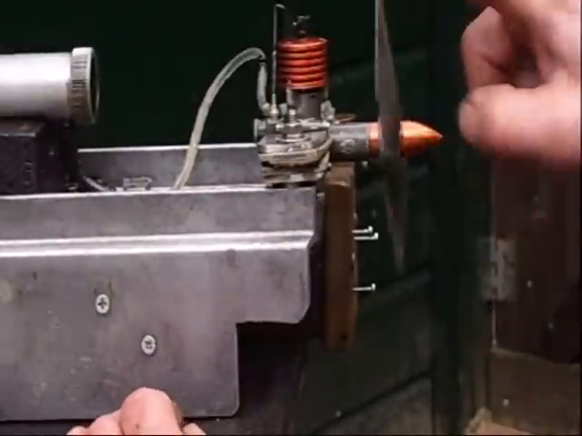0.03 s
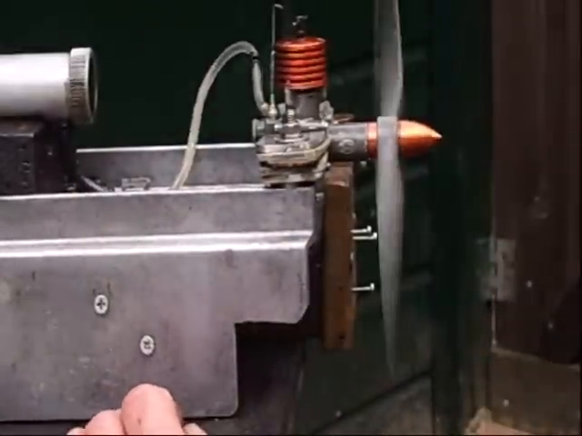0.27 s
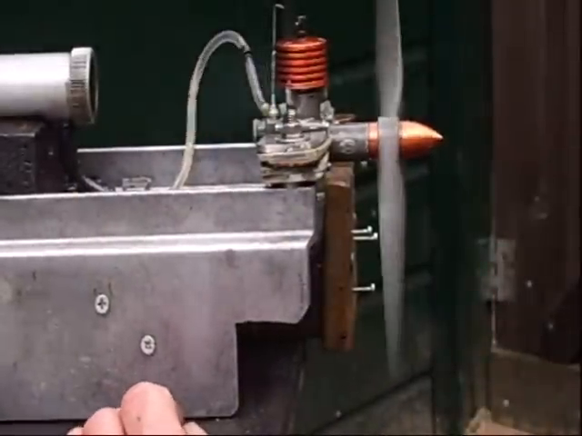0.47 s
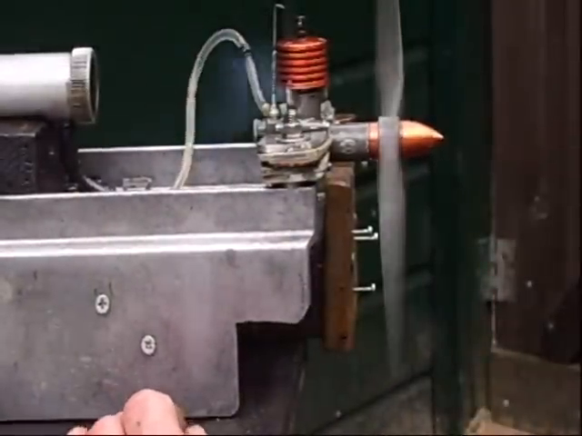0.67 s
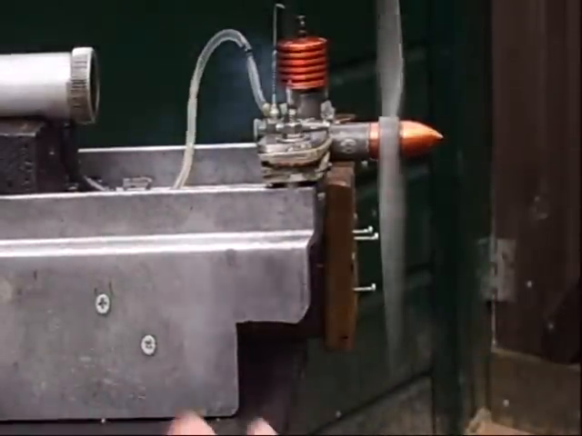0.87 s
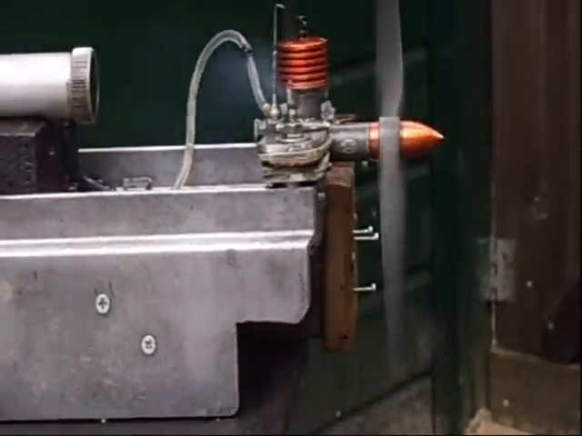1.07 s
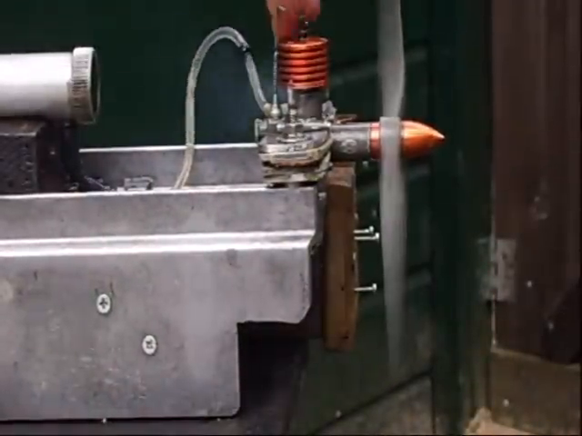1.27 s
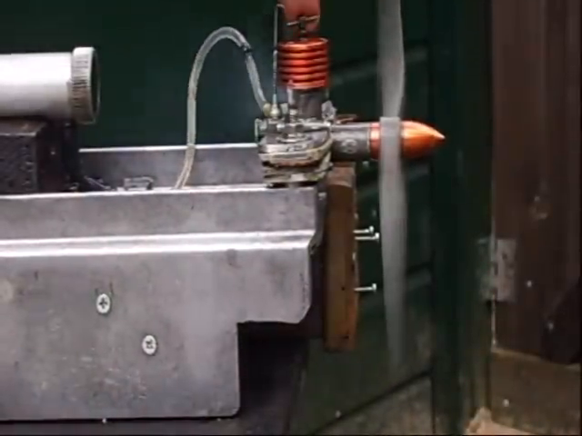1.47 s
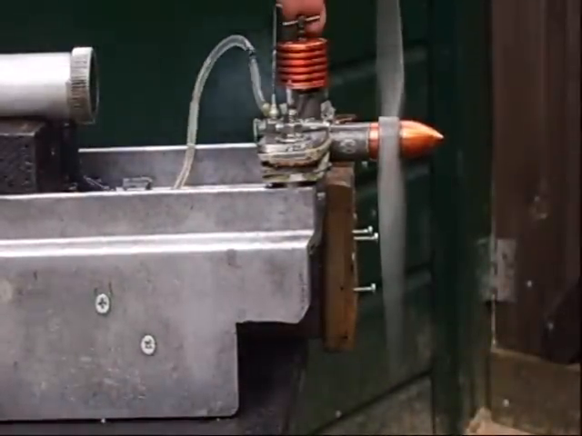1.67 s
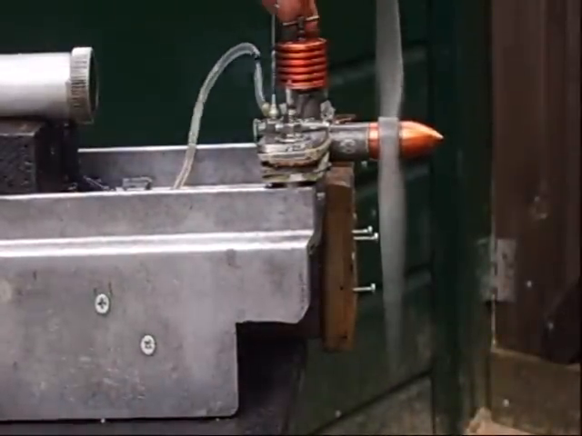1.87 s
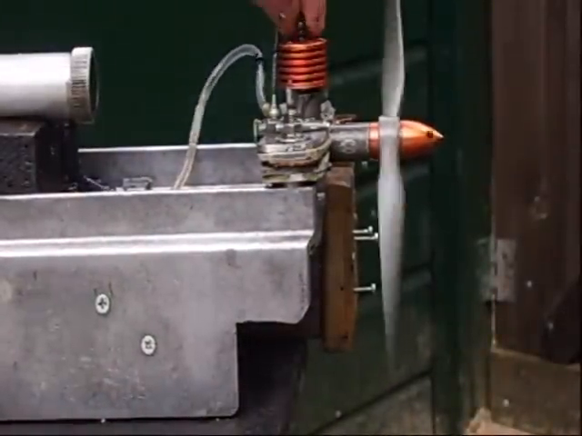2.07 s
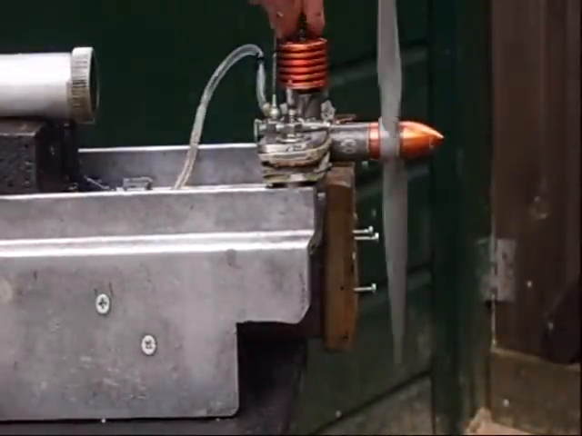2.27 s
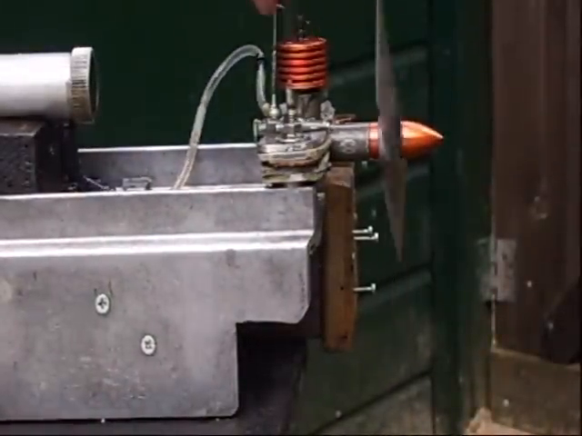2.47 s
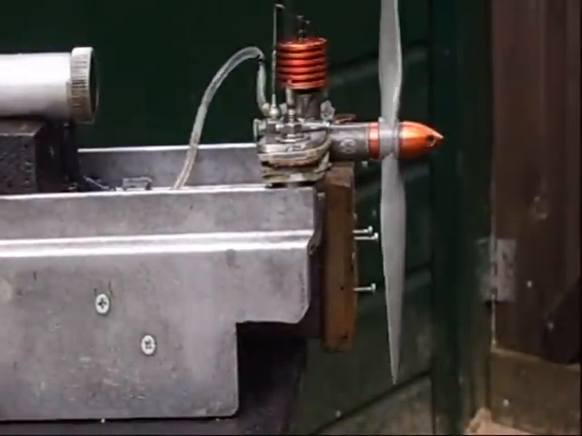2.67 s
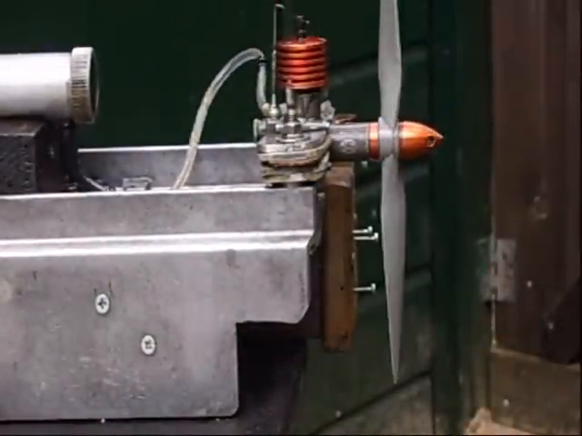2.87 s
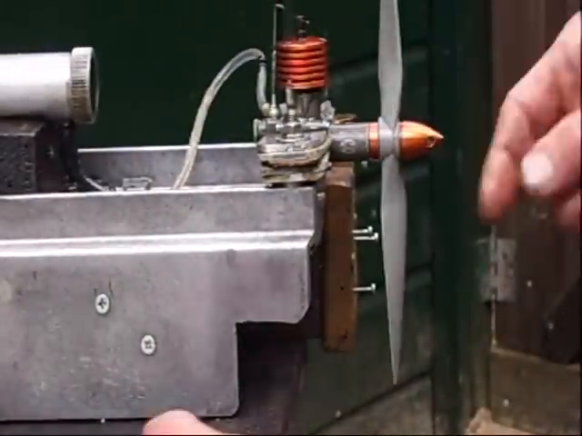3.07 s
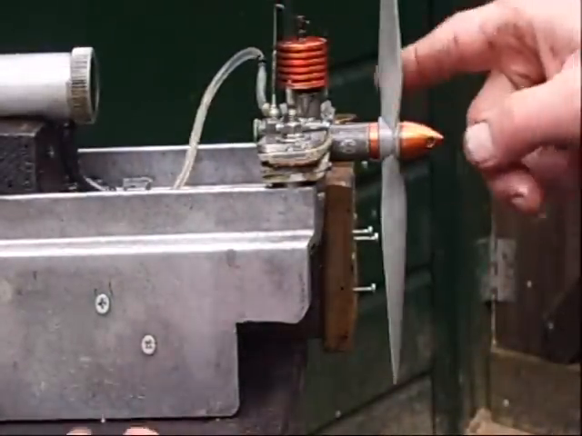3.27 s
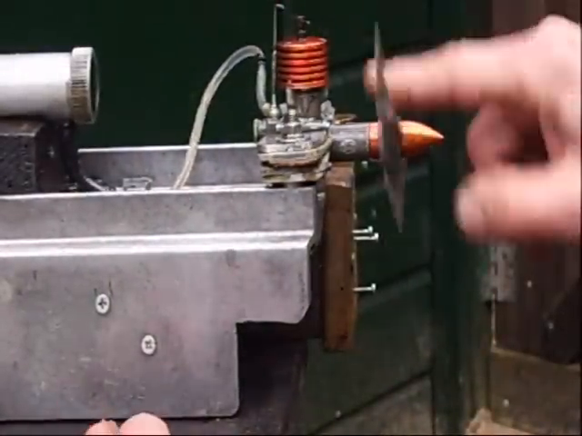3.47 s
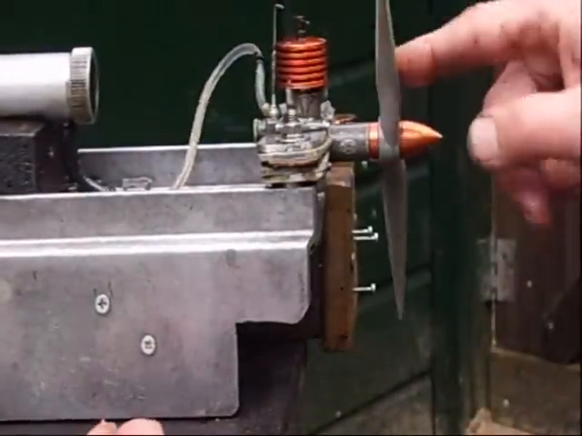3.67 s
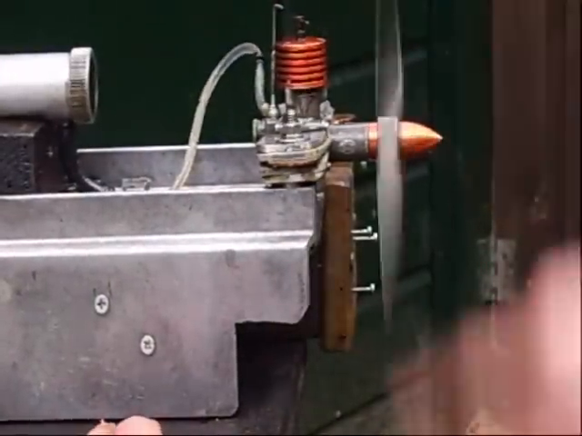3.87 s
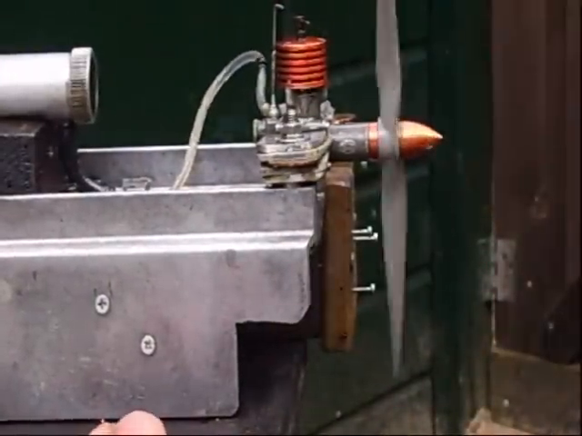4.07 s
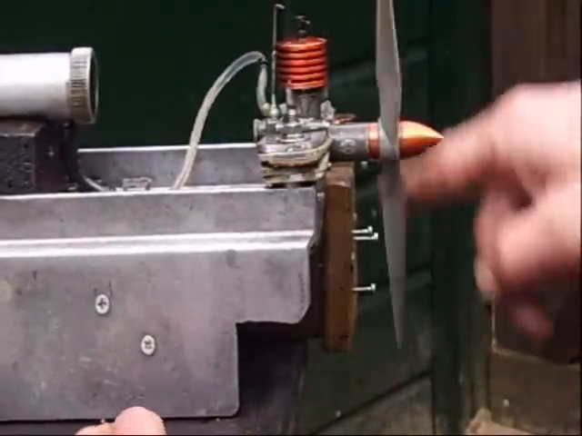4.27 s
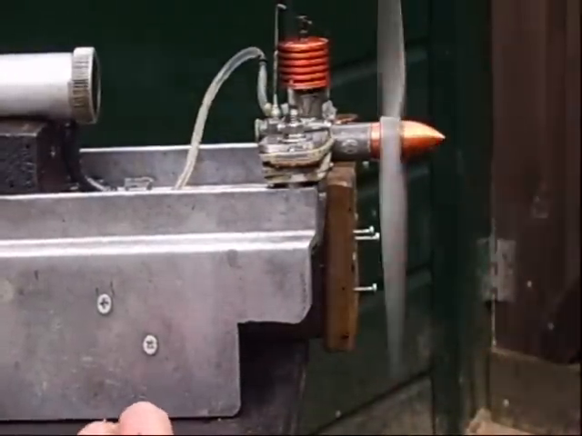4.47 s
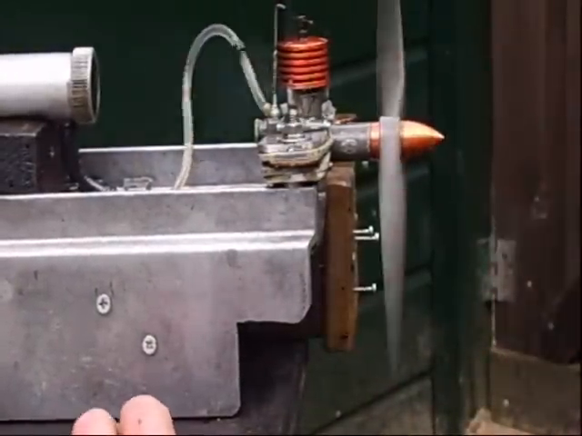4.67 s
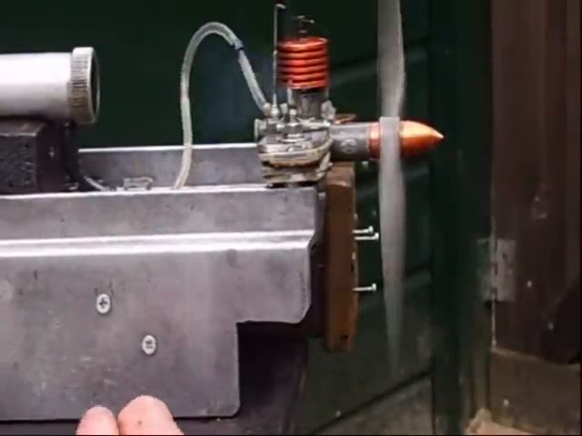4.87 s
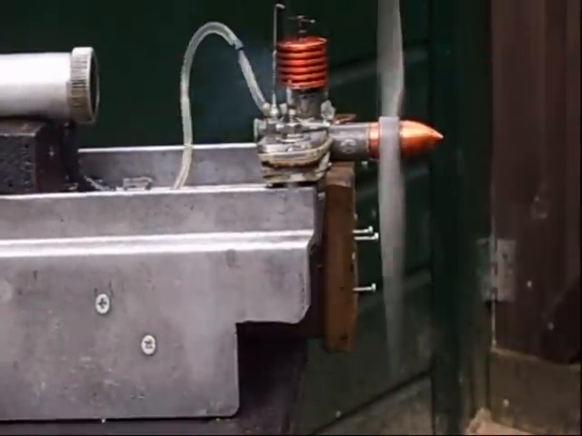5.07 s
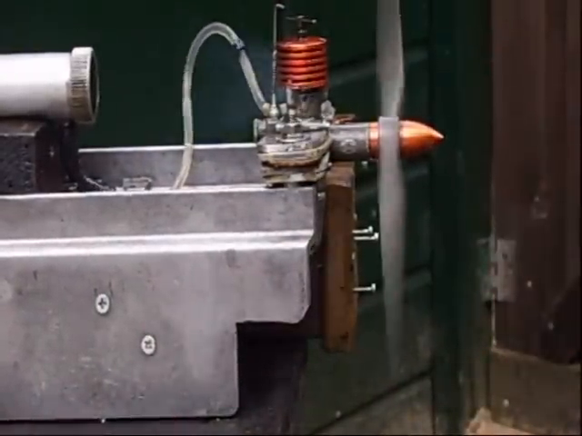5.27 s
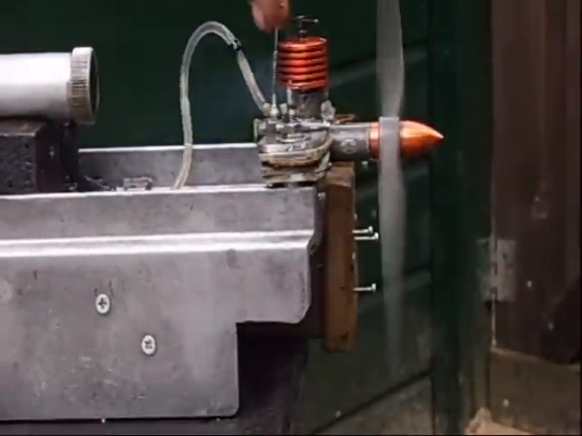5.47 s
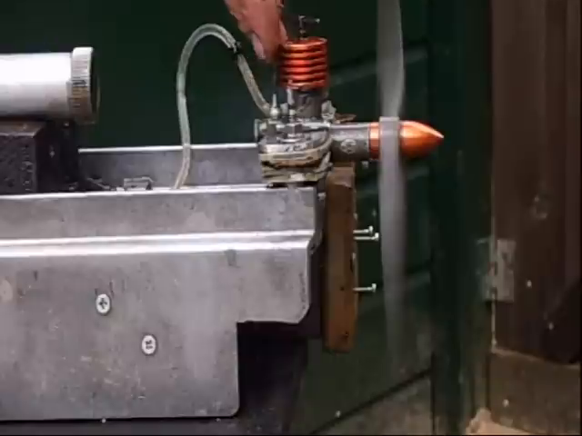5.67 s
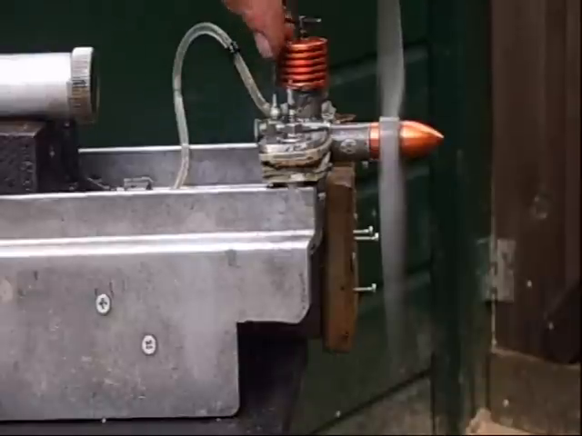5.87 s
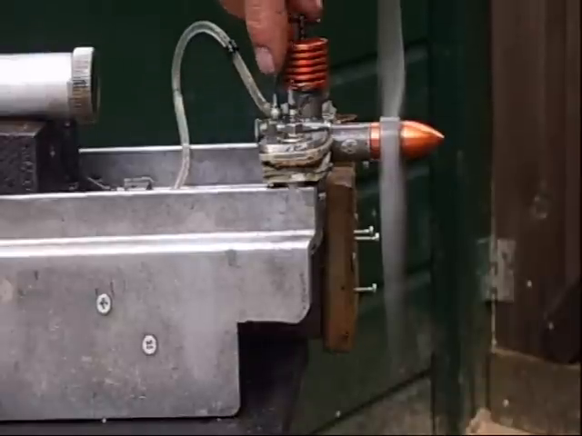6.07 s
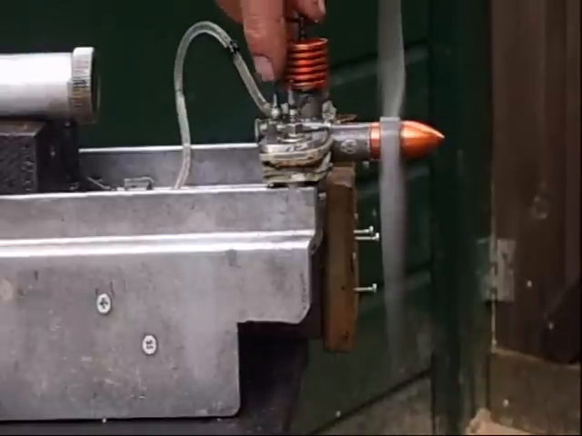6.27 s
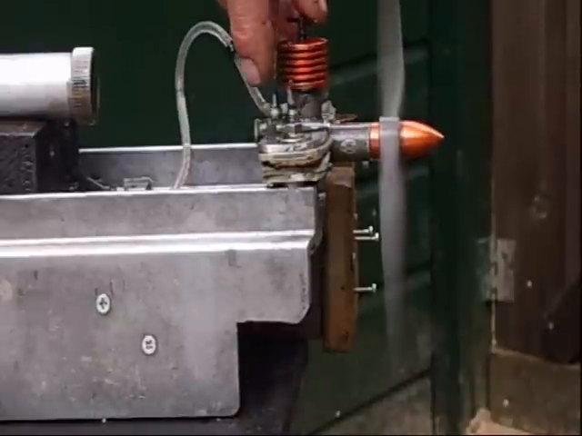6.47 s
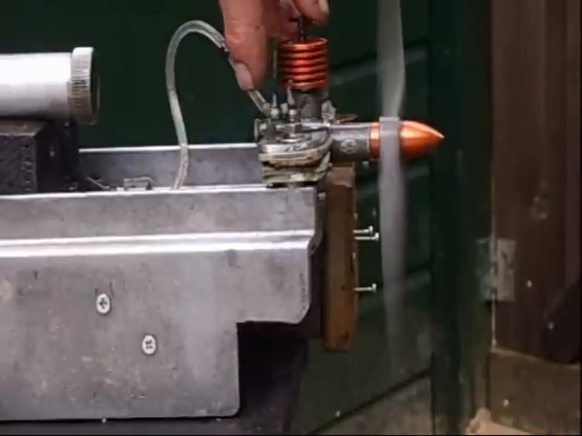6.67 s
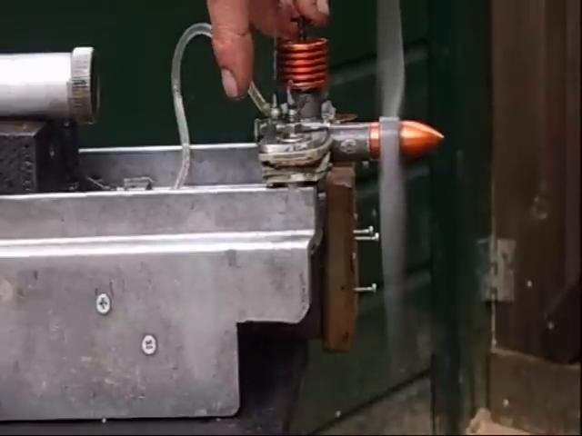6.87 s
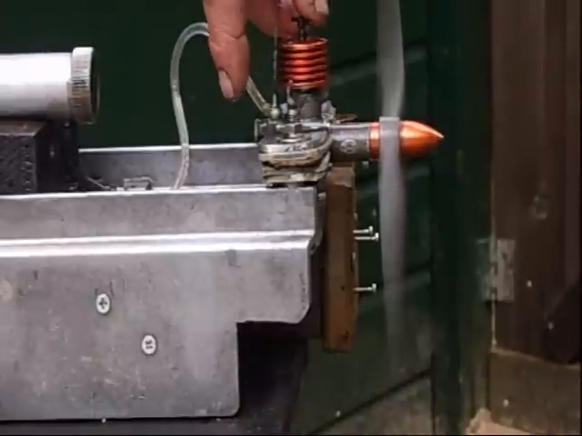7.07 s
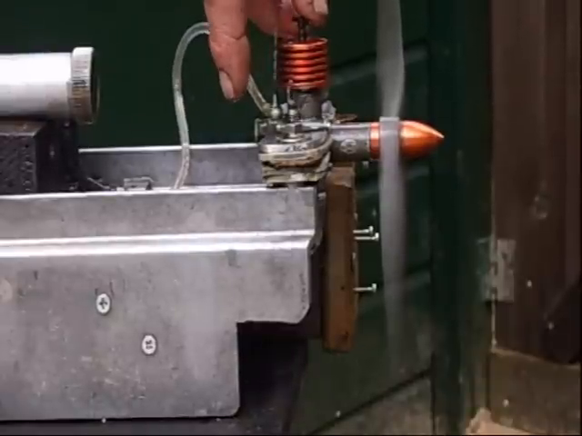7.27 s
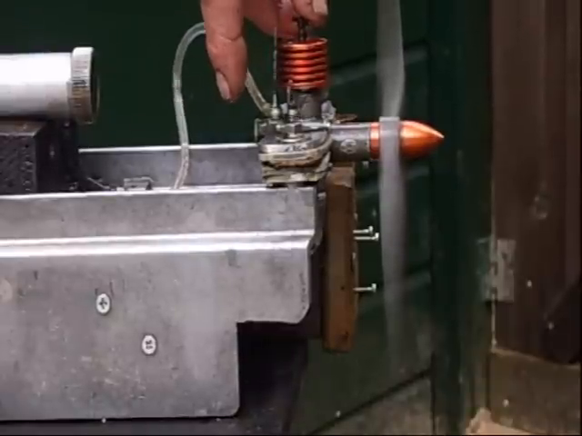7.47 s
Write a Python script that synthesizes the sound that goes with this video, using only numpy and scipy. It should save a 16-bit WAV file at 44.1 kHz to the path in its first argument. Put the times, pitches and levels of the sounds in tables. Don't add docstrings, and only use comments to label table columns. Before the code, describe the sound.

A tiny model engine is flicked into a harsh rattling buzz, sputters out, clicks under finger flicks, then restarts into a loud, rising, steady scream.

```python
import sys
import numpy as np
from scipy import signal
from scipy.fft import rfft, irfft
from scipy.io import wavfile
from scipy.ndimage import uniform_filter1d

SR = 44100
rng = np.random.default_rng(int(sys.argv[2]) if len(sys.argv) > 2 else 0)


def undo_db(level):
    steps = np.asarray(level, float) / 20
    return 10 ** steps


def to_wav(s):
    ch = np.atleast_2d(s).T
    pcm = np.round(np.clip(ch, -1, 1) * 32767)
    wavfile.write(sys.argv[1], SR, pcm.astype(np.int16))


N = 332073

# (frequency [Hz], width [Hz], level [dB])
CASE = [(1425, 173, 0), (1743, 163, 0.5), (2012, 91, 3), (2315, 270, 0), (2701, 106, 5), (3058, 72, 5),
        (3286, 105, 0.5), (3618, 450, -0.5), (3500, 170, -36), (4350, 510, -21.5)]
# (frequency [Hz], width [Hz], level [dB])
BENCH = [(310, 45, -6.5), (480, 80, -11.5), (629, 152, 2), (758, 74, 6.5), (918, 264, 8.5), (980.5, 104, 9),
         (1138, 44, 6)]


def in_time(rows, t):
    s, *columns = np.transpose(rows)
    return [np.interp(t, s, column) for column in columns]


def swells(rows, t):
    rows = np.array(rows)
    centre_s, half_width_s = rows[:, :1], rows[:, 1:2]
    return rows[:, 2:].T @ np.exp(-((t - centre_s) / half_width_s) ** 2)


def coloured(spectrum):
    hz, db = np.transpose(spectrum)
    bins_hz = np.arange(1, N // 2 + 2) * SR / N
    gain = undo_db(np.interp(np.log(bins_hz), np.log(hz), db))
    noise = irfft(rfft(rng.standard_normal(N)) * gain, N)
    return noise / noise.std()


def resonate(x, modes):
    out = 0
    for hz, width_hz, db in modes:
        r = np.exp(-np.pi * width_hz / SR)
        b = (1 - r * r) / 2 * np.array([1, 0, -1])
        a = [1, -2 * r * np.cos(2 * np.pi * hz / SR), r * r]
        out = out + undo_db(db) * signal.lfilter(b, a, x + 1e-18)
    return out


def high_pass(x, cut_hz):
    return signal.sosfilt(signal.butter(3, cut_hz, "high", fs=SR, output="sos"), x)


def lay(at_s, gain, shape):
    samples = np.ceil(at_s * SR).astype(int)[:, None] + np.arange(512)
    rows = gain[:, None] * shape(samples / SR - at_s[:, None])
    return np.bincount(samples.ravel(), rows.ravel(), N + 1024)[:N]


def hand_level(rows, lift_db, fade):
    t = np.arange(N) / SR
    moving = (t > rows[0][0]) & (t < rows[-1][0])
    return uniform_filter1d(moving * 1., size=fade) * undo_db(in_time(rows, t)[0] + lift_db)


def shed_air():
    # (frequency [Hz], level [dB per Hz])
    air = [(15, -9), (45, 5.5), (85, -2), (478, 3), (1000, -3), (1720, -13.5), (5000, -26), (15500, -31)]
    return undo_db(-51) * coloured(air)


def whine():
    # (frequency [Hz], rms level [dB])
    tones = [
        (4683, -72),
        (9324, -77),
    ]
    t = np.arange(N) / SR
    return sum(undo_db(db) * np.sqrt(2) * np.sin(2 * np.pi * hz * t) for hz, db in tones)


def sleeve():
    # (time [s], level [dB])
    rustle = [
        (2.99, -57),
        (3.078, -49.5),
        (3.086, -37.5),
        (3.1, -53),
        (3.104, -46),
        (3.17, -52),
        (3.26, -70),
    ]
    # (frequency [Hz], level [dB per Hz])
    cloth = [(35, -34), (60, -2), (300, -7), (780, -4.5), (1490, -19), (4510, -18), (7000, -30),
             (15000, -27)]
    return hand_level(rustle, 6.5, 1500) * coloured(cloth)


def scuff():
    # (time [s], level [dB])
    rub = [
        (2.88, -80),
        (2.892, -69),
        (2.92, -61),
        (3.022, -59),
        (3.028, -70),
        (3.05, -50),
    ]
    # (frequency [Hz], width [Hz], level [dB])
    metal = [(980, 270, 8), (2700, 300, 2.5), (3260, 270, -13), (11000, 1200, -11)]
    return hand_level(rub, 16.5, 900) * resonate(rng.standard_normal(N), metal)


def squeaks():
    # (time [s], half width [s], gain)
    rubs = [
        (2.535, 0.014, 0.95),
        (3.94, .015, 1),
        (4.23, .015, .6),
        (4.355, .012, .9),
    ]
    # (frequency [Hz], width [Hz], level [dB])
    blade = [(2600, 300, 3), (3100, 300, -6)]
    return undo_db(-48) * swells(rubs, np.arange(N) / SR)[0] * resonate(rng.standard_normal(N), blade)


def port_opens(at_s, push_db, crack_db, jet_db, gap_s, rough, stub_hz, stub_db, leak_db, cut_hz):
    # (frequency [Hz], width [Hz], level [dB])
    port = [(8320, 620, -2), (9500, 940, -6), (10100, 250, -2), (10900, 590, -4), (12800, 320, -33),
            (15500, 700, -41)]
    # (frequency [Hz], width [Hz], level [dB])
    fins = [(5470, 200, -30), (7780, 1500, -23.5), (10180, 430, -15.5), (10870, 560, -1.5),
            (12440, 1750, -5), (13250, 310, -6), (15900, 680, 2.5)]
    # (frequency [Hz], width [Hz], level [dB])
    blowby = [(4600, 690, 0)]
    vary = rng.standard_normal((len(at_s), 4))
    gap = (gap_s * (1 + .01 * vary[:, 3]))[:, None]
    gas = rng.standard_normal((2, len(at_s), 512))

    def bump(t, width_s):
        return np.exp(-((t - .0004) / width_s) ** 2)

    push = lay(at_s - .0003, undo_db(push_db + 0.67 * vary[:, 0]),
               lambda t: bump(t, 0.000097) + 0.82 * bump(t - gap, 0.28 * gap))
    crack = lay(at_s - .00035, undo_db(crack_db + .5 * vary[:, 1]),
                lambda t: bump(t, .00005) + rough * gas[0] * np.exp(-t / 0.0029))
    jet = lay(at_s - .0004, undo_db(jet_db + 0.12 * vary[:, 2]),
              lambda t: 9 * bump(t, .000025) + 0.15 * gas[1] * np.exp(-t / .0007))
    stub = lay(at_s, undo_db(jet_db + stub_db + 0.97 * vary[:, 2]),
               lambda t: np.cos(2 * np.pi * stub_hz[:, None] * t) * np.exp(-t / 0.00036))
    hiss = lay(at_s - .0004, undo_db(jet_db - 3.5), lambda t: gas[0] * np.exp(-t / 0.013))
    leak = lay(at_s - .0004, undo_db(jet_db + leak_db), lambda t: gas[1] * np.exp(-t / 0.0033))
    bang = undo_db(-7) * push + resonate(push, BENCH) + resonate(crack, CASE)
    bang = bang + undo_db(3.5) * resonate(jet, port) + resonate(hiss, fins) + stub + resonate(leak, blowby)
    return high_pass(bang, cut_hz)


def flicks():
    # (time [s], peak level [dB], sharpness [dB], push repeat [Hz])
    puffs = [(.157, -28, -11, 550), (0.173, -16.5, -3, 716), (2.161, -23, -0.5, 910), (2.229, -41, 5, 557),
             (2.249, -29.5, -9, 716), (2.303, -44, 2, 711), (2.321, -30.5, -13, 695), (2.33, -28, -13, 493),
             (2.922, -28.5, -20, 544), (3.083, -40, 7, 915), (3.105, -34, 2, 770), (3.129, -29, -3, 740),
             (3.156, -40, 6, 498), (3.326, -43.5, 5, 452), (3.974, -37.5, 14.5, 1170),
             (3.975, -12, -20, 590), (3.998, -24, 2, 953), (4.01, -15, 0, 840), (4.052, -22.5, -6, 930),
             (4.104, -30, -14, 710), (4.11, -22, -9.5, 587), (4.174, -35.5, -8, 645), (4.264, -39, -8, 886),
             (4.28, -32.5, -12, 506), (4.349, -35.5, -13, 1030), (4.443, -37, -16, 708),
             (4.465, -19, 2, 750)]
    s, db, sharp_db, repeat_hz = np.transpose(puffs)
    crack_db = db + sharp_db + 5.0
    jet_db = db + sharp_db - 11
    return port_opens(s + .0007, db - 3.0, crack_db, jet_db, 1 / repeat_hz, rough=0.49,
                      stub_hz=4170 + 0 * s, stub_db=10, leak_db=-2, cut_hz=180)


def propeller_hum(turns, rate):
    # (multiple of the turn, level above push [dB], power of speed)
    hum = [
        (2, -18, 4.6),
        (3, -16.5, 2.3),
        (4, -25.5, 1.5),
    ]
    return sum(undo_db(db) * (rate / 100) ** power * np.sin(2 * np.pi * round(k) * turns)
               for k, db, power in hum)


def propeller_wash(push_level):
    # (frequency [Hz], level [dB per Hz])
    wash = [(25, -1), (60, 3), (120, 2), (300, 5.5), (600, 9.5), (1200, -14)]
    return undo_db(-21) * push_level * coloured(wash)


def cylinder_swing(fire_s, db, speed):
    hz = (8.93 * speed)[:, None]

    def swing(t):
        rise = 1 - np.exp(-(t / 0.00039) ** 2)
        return np.cos(2 * np.pi * hz * (t - .00105)) * rise * np.exp(-(hz * t / 1.85) ** 0.31)

    return lay(fire_s - .0009, undo_db(db + 8) * (speed / 100) ** 3.8, swing)


def ignition_knock(knock_s, knock_db, rate):
    def rap(t):
        grit = .06 * rng.standard_normal(t.shape) * np.exp(-t / .0006)
        return np.exp(-((t - .0001) / .00003) ** 2) + grit

    tick = lay(knock_s, undo_db(knock_db + rng.normal(0, 1.2, len(knock_s))), rap)
    heavy = tick * np.minimum(rate / 65, 1) ** 2.5
    body = undo_db(-4) * resonate(heavy, BENCH) + undo_db(10) * resonate(heavy, CASE)
    return body + undo_db(5.5) * high_pass(tick, 4300)


def engine():
    # (time [s], speed [turns per s])
    speed_1 = [
        (.17, 27.39),
        (.25, 44.34),
        (.84, 69.37),
        (1.044, 67.21),
        (1.313, 75.32),
        (1.428, 75.95),
        (1.925, 45.49),
        (2.099, 33.22),
        (2.21, 6.46),
    ]
    speed_2 = [
        (4.46, 33.6),
        (4.747, 83.8),
        (5.015, 78.56),
        (5.403, 85.23),
        (5.585, 93.8),
        (6.068, 101.72),
        (6.244, 102.88),
        (6.781, 110.9),
        (7.53, 113.37),
    ]
    first_firing_s = (.1835, 4.4755)
    # (time [s], charge [dB], knock above push [dB], push gap trim [ratio])
    run_1 = [
        (.17, -5, -26, 1),
        (.22, -0.5, -28, 0.87),
        (.4, -0.5, -29, 0.93),
        (.55, -0.5, 4, .87),
        (.75, -2, -28, 0.91),
        (1.3, -1, -13, .91),
        (1.75, -1, 7, 0.9),
        (2.12, -2, 3, 0.99),
        (2.2, -11.5, 0, 0.58),
    ]
    run_2 = [
        (4.47, -1, -9, 0.94),
        (4.7, 0, 5.5, 0.83),
        (5.0, -1.5, -30, 0.9),
        (5.35, -1, -5, 0.84),
        (5.72, -2, 12.5, 0.87),
        (6.0, -1, -17, 0.79),
        (6.5, -1.5, 3, 0.87),
        (6.9, -0.5, -76, 0.73),
        (7.52, -1, -29, 0.76),
    ]
    # (time [s], half width [s], extra speed [turns per s])
    surges = [
        (.345, .046, -13.25),
        (.629, .122, 14.54),
        (4.842, .07, 8.0),
        (7.192, .181, -1.13),
    ]
    # (time [s], half width [s], push [dB], crack and jet [dB])
    misfires = [
        (.305, 0.022, -8.5, -10),
        (6.66, 0.032, -5.5, 0.5),
        (7.4, 0.1, -2.5, 0.5),
    ]
    t, drone, push_level = np.arange(N) / SR, 0, 0
    fire, knock = [], []
    rate = in_time(speed_1 + speed_2, t)[0] + swells(surges, t)[0]
    weak_db, dull_db = swells(misfires, t)
    charge_db = in_time(run_1 + run_2, t)[0]
    push_db = -17.5 + 3.5 * np.log2(rate / 70) + charge_db + weak_db
    for speed, first_s in zip((speed_1, speed_2), first_firing_s):
        on = (t > speed[0][0]) & (t < speed[-1][0])
        turns = np.cumsum(rate) / SR
        turns = turns - np.interp(first_s, t, turns)
        whole = np.arange(int(turns[on][-1]) + 1)
        fire.append(np.interp(whole, turns, t))
        knock.append(np.interp(whole - .4, turns, t))
        loud = undo_db(push_db) * uniform_filter1d(on * 1., size=2000)
        drone = drone + loud * propeller_hum(turns, rate)
        push_level = push_level + loud
    fire, knock = np.concatenate(fire), np.concatenate(knock)
    _, knock_db, trim = in_time(run_1 + run_2, fire)
    speed, db, dull = (np.interp(fire, t, v) for v in (rate, push_db, dull_db - weak_db))
    crack_db = -4.5 + 0.1883 * (speed - 70) + dull
    jet_db = -9 + 0.1784 * (speed - 70) + dull
    gap_s = trim * (.0005 + .085 / np.maximum(speed, 35))
    db = db - 10 * np.log10(speed / 100)
    jitter_s = .00003 * (70 / np.maximum(speed, 60)) ** 2
    fire = fire + jitter_s * rng.standard_normal(len(fire))
    bang = port_opens(fire, db + 8.5, db + crack_db + 24, db + jet_db + 7.0, gap_s, rough=0.024,
                      stub_hz=4070 + 13.46 * speed, stub_db=13 + 0.01 * (speed - 93),
                      leak_db=10 - 0.2344 * (speed - 43), cut_hz=378)
    bang = bang + ignition_knock(knock, db + knock_db, rate)
    drone = drone + cylinder_swing(fire, db, speed)
    return bang, drone + propeller_wash(push_level)


def shed(x):
    # (delay [s], level [dB])
    walls = [
        (.0032, -6.5),
        (.0046, -7.5),
        (.0085, -23.5),
        (0.0116, -27),
    ]
    t, t60_s = np.arange(12000) / SR, 0.11
    tail = rng.standard_normal(len(t)) * undo_db(-60 * t / t60_s) * (1 - np.exp(-(t / .007) ** 2))
    tail = signal.lfilter([.6], [1, -.4], tail)
    echoes = sum(undo_db(db) * np.maximum(1 - np.abs(t - delay_s) * SR, 0) for delay_s, db in walls)
    echoes = signal.lfilter([1, -.95], [1, -.82], echoes)
    echoes = signal.lfilter([.55], [1, -.45], echoes)
    response = echoes + undo_db(-7.5) * tail / np.sqrt(np.sum(tail ** 2))
    response[0] = 1
    return signal.fftconvolve(x, response)[:N]


def scene():
    background = shed_air() + whine()
    hand = sleeve() + scuff() + squeaks()
    bang, drone = engine()
    return (background + hand + drone + shed(bang + flicks()))[None]


def band_limit(x):
    return signal.sosfilt(signal.butter(12, 15700, fs=SR, output="sos"), x)


def record(dry):
    top_cut = signal.ellip(10, .5, 55, 15650, fs=SR, output="sos")
    mix = np.clip(signal.sosfilt(top_cut, dry), -1, 1)
    return band_limit(mix)


dry = scene()
out = record(dry)
to_wav(out)
```